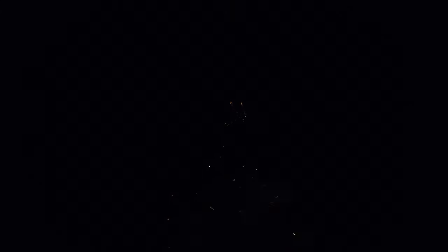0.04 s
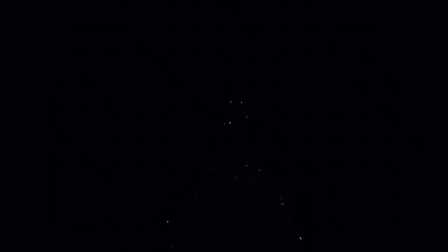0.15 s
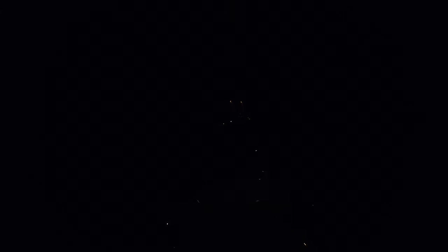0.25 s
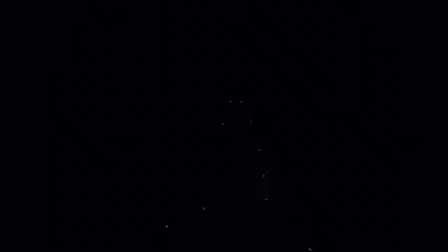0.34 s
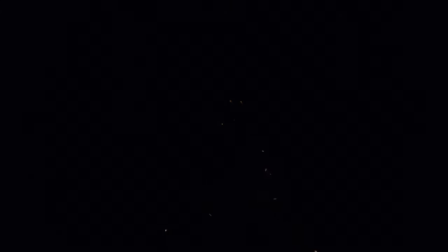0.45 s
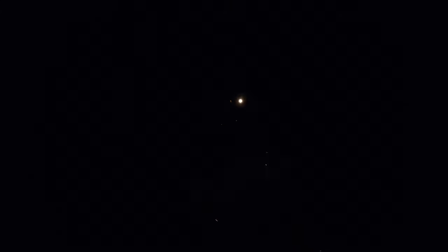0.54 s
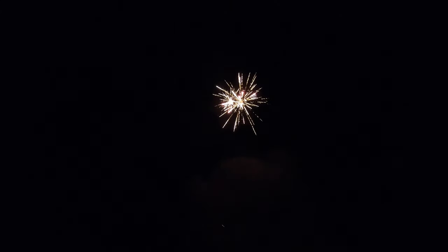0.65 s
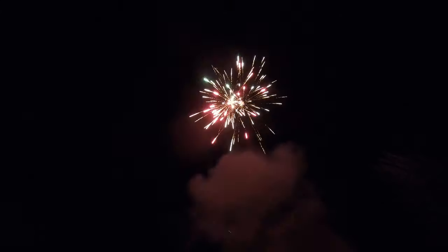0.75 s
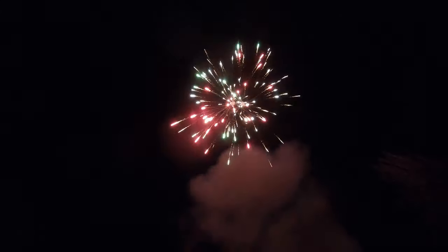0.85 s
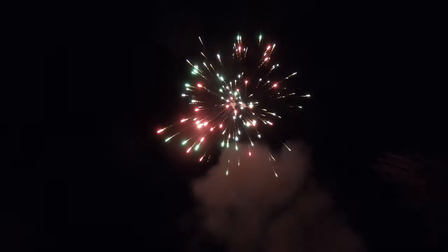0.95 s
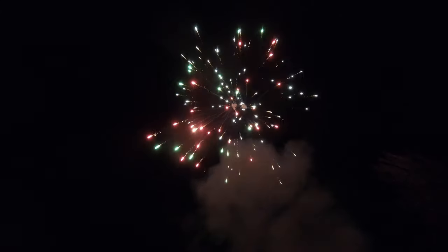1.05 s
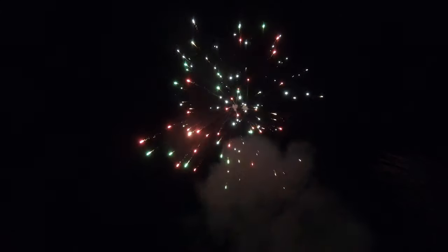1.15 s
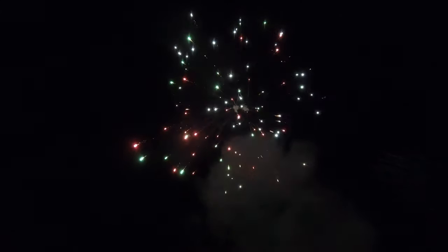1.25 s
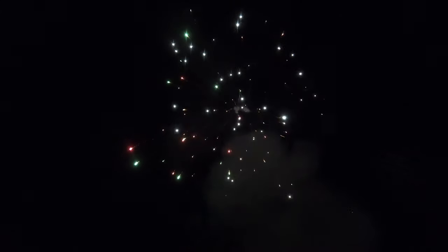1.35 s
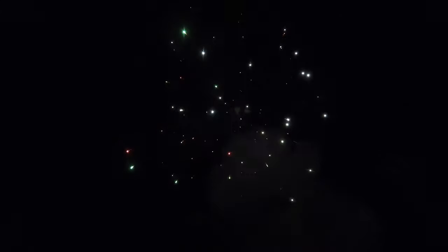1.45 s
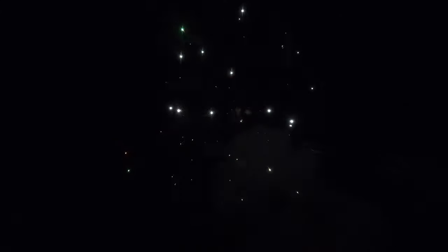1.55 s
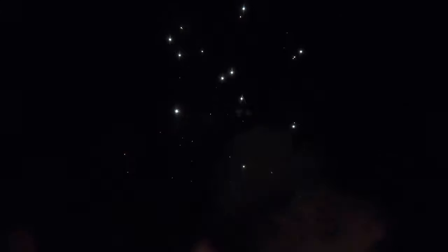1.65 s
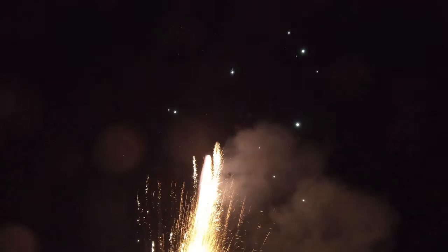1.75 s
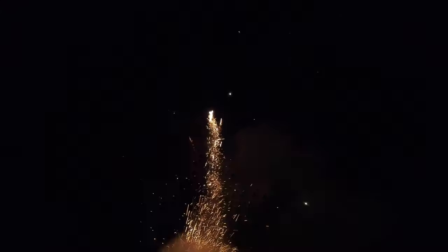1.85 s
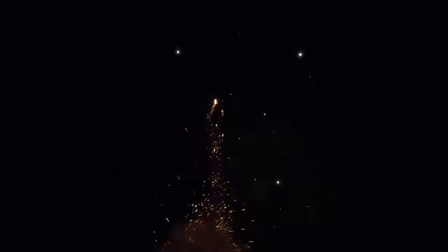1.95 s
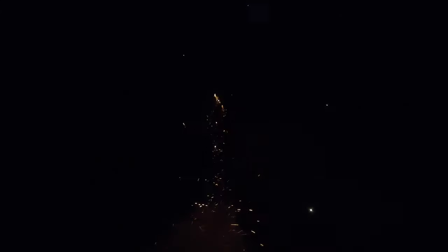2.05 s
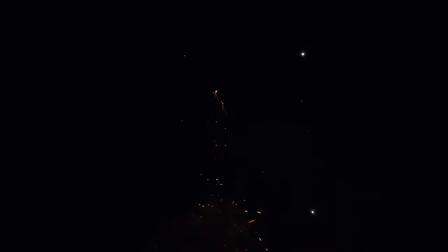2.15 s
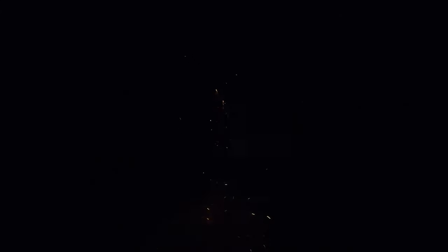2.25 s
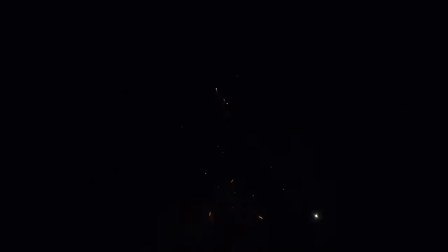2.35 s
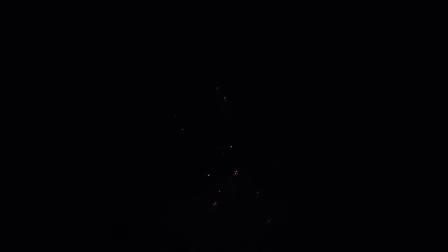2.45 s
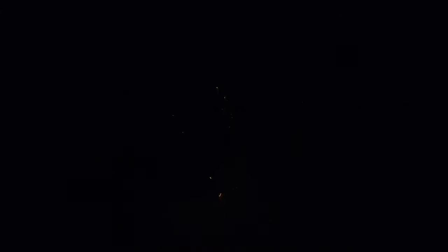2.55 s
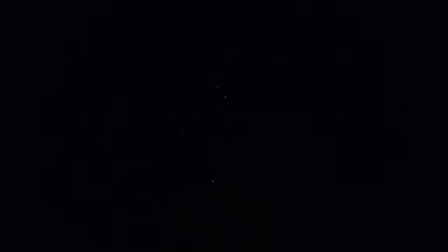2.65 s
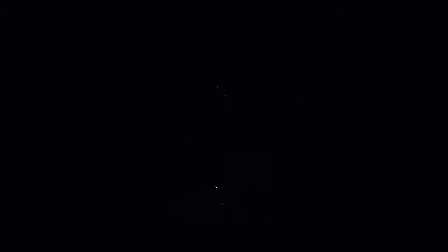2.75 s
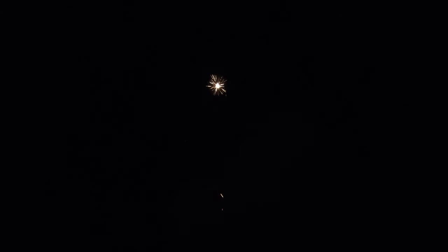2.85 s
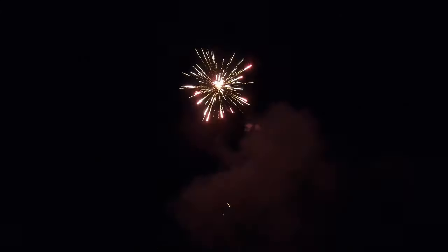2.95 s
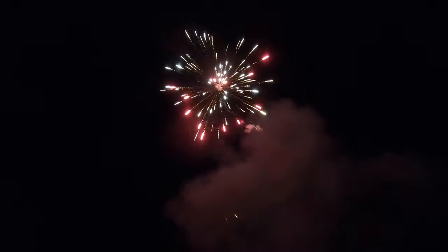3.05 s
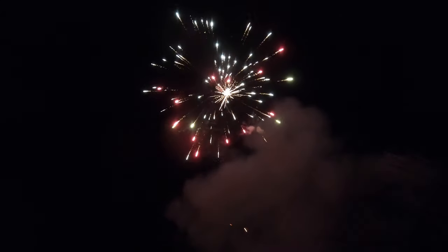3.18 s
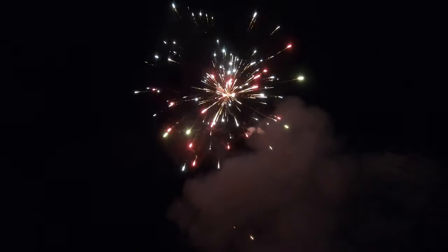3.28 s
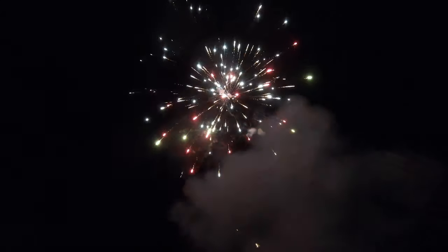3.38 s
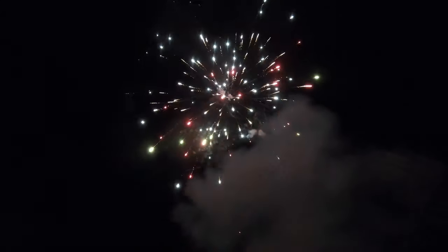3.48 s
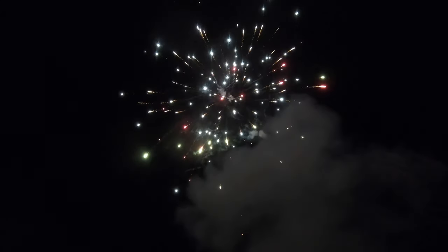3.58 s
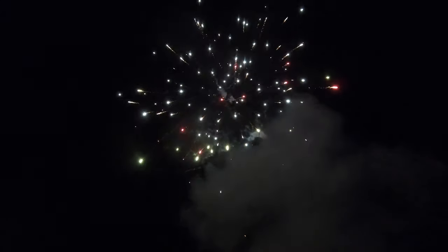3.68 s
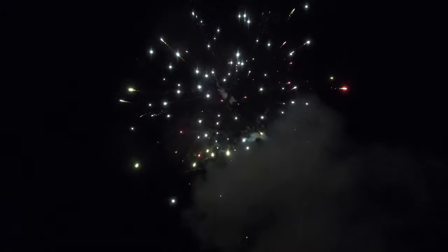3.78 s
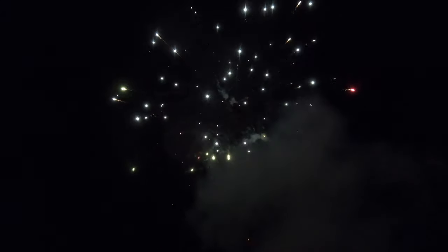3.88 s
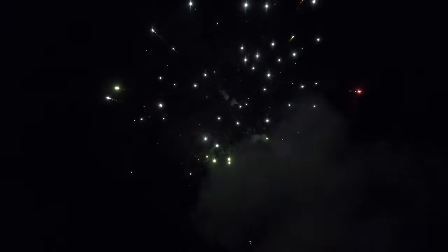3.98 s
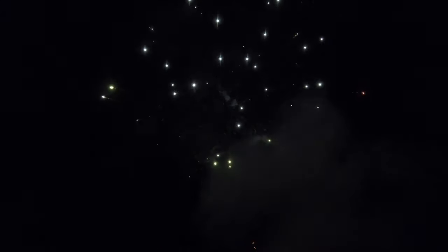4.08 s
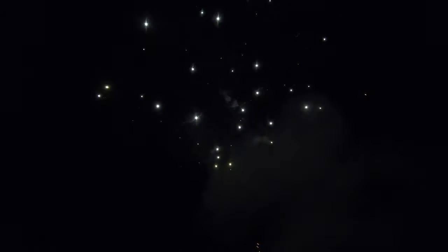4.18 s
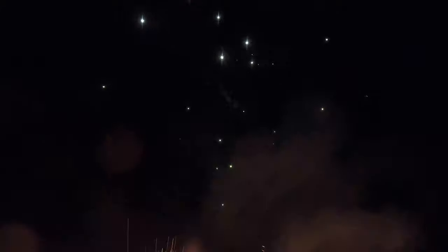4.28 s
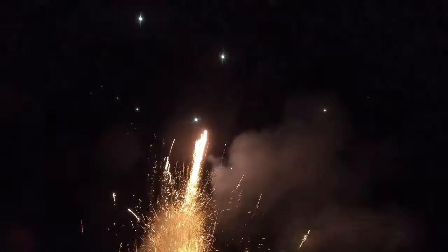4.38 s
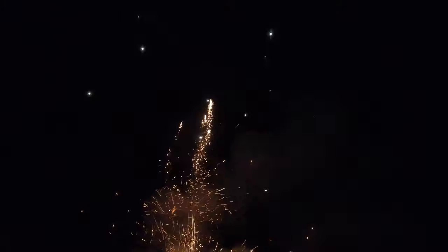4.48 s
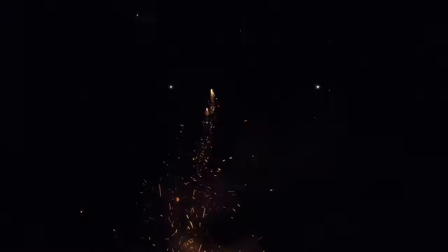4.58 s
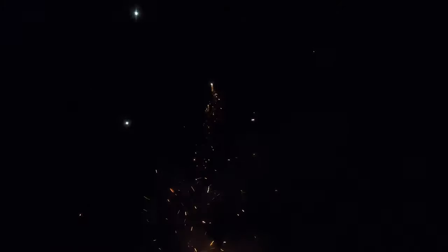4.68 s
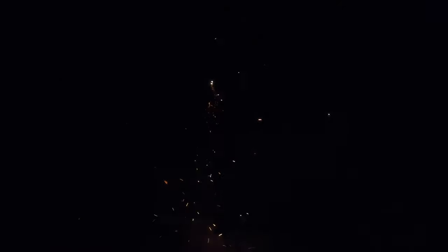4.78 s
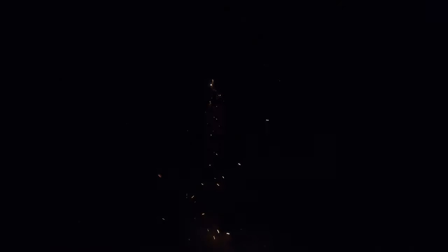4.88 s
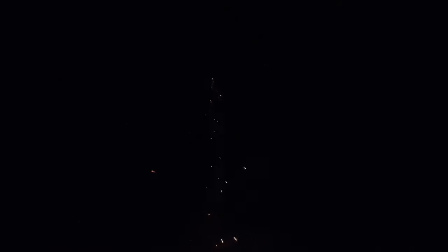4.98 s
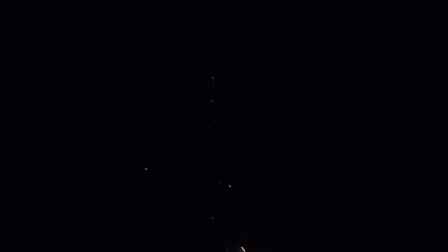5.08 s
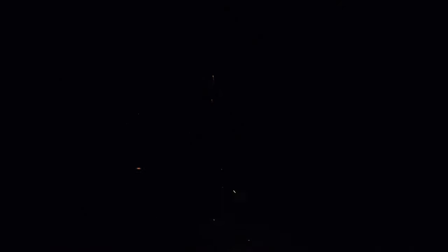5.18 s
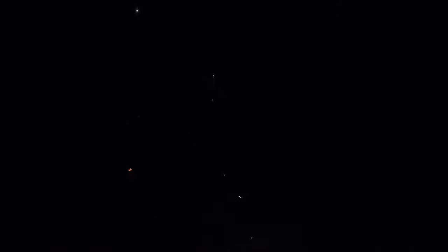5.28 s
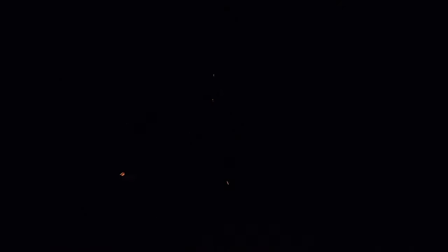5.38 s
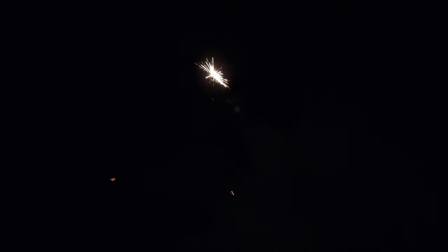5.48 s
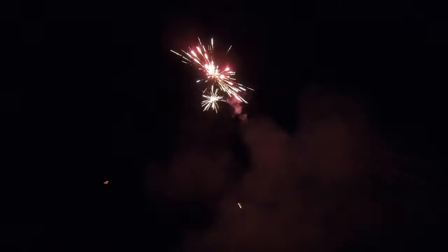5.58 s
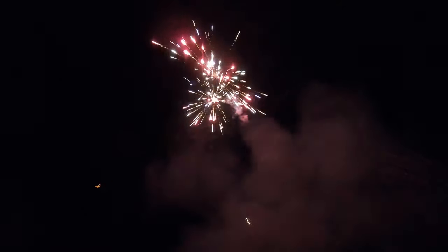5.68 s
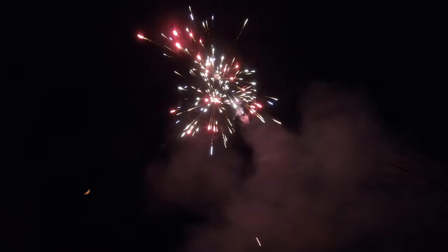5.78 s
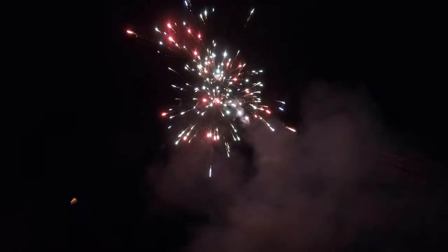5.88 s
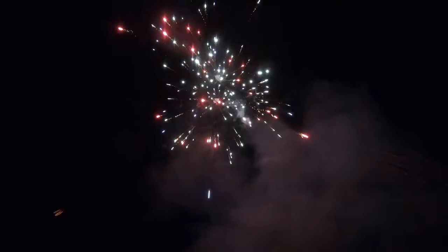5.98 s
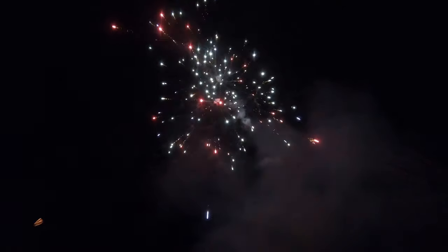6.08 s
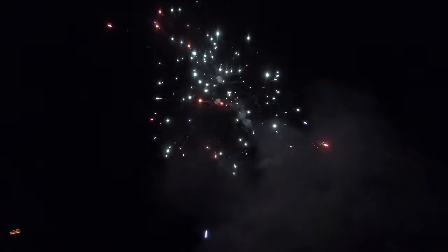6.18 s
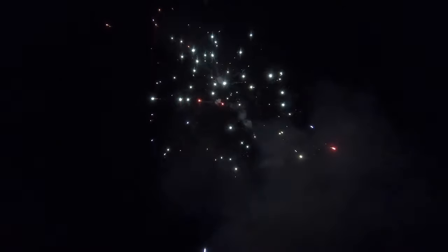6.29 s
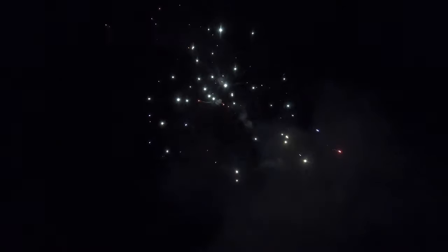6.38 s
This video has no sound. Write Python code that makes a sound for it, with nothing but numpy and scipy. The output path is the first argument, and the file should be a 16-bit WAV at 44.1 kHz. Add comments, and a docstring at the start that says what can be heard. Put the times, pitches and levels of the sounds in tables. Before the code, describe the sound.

A quiet, low night hum opens the scene outdoors. At about 0.7 seconds two shells burst overhead in rapid succession, each a hard crack with a deep thump, preceded by a tiny swelling flutter. Dull wall slaps follow and a broad, low rush of far echoes rolls on. Near 1.65 a nearly merged double launch thuds from the tubes, its brief rush dropping to a faint murmur. At 2.97 and 3.29 two more bursts bang, more clearly separated, with brighter cracks and a long rumbling tail. Small bright ticks of burnt scraps landing dot 3.6 to 4.1, on both sides. Another tight launch pair hits at 4.3, then murmur, with a very faint tick at 5.3. The last two bursts crack at 5.56 and 5.7, their echoes still rolling at the end, around 6.4. The stereo phone is close, and the background dips or shifts briefly at the reports.

```python
"""Outdoors at night, among walls and far slopes: a firework cake goes off near a stereo phone. Launch reports
come in pairs from the tubes, shell bursts in pairs overhead; each is a sharp pressure flip, a noisy crack and a
low thump, with low swells and short softer pulses just before it; a thin tone near 8 kHz also rises into each.
Walls return dull thumps, and far scenery a long rush of shaped noise whose bands rise and fade separately. A
few burnt scraps tick down as ringing, gritty clicks, over the night's hum, a steady coloured noise."""
import sys
import numpy as np
from scipy import signal
from scipy.fft import rfft, irfft
from scipy.io import wavfile
from scipy.ndimage import uniform_filter1d

SR = 44100
rng = np.random.default_rng(int(sys.argv[2]) if len(sys.argv) > 2 else 0)


def master(y):
    """Save y as 16-bit WAV."""
    cut = np.clip(np.atleast_2d(y).T, -1, 1)
    pcm = np.round(cut * 32767)  # scale
    wavfile.write(sys.argv[1], SR, pcm.astype(np.int16))


N = 283563


def undb(db):
    """Turn dB into an amplitude factor."""
    return 10 ** (np.asarray(db) / 20)


def along(table, hz):
    """Read a (f/Hz, value) table on a log-frequency axis."""
    f, v = np.transpose(table)
    return np.interp(np.log(np.maximum(hz, 1)), np.log(f), v)


def add(out, x, s, pan_db):
    """Mix a short sound in, its middle sample at s seconds; pan_db is left minus right."""
    i = int(s * SR) - x.shape[-1] // 2
    out[:, i:i + x.shape[-1]] += x * undb(np.array([[pan_db], [-pan_db]]) / 2)


def dull(x, hz):
    """Take off the treble above hz with a gentle low-pass."""
    return signal.sosfilt(signal.butter(2, min(hz, .45 * SR), fs=SR, output="sos"), x)


def flip(t, lead_s=.00040, back_s=.00046, soft_hz=4200.):
    """The shock front: a quick climb, a sudden drop through zero, a short low plateau."""
    climb = 1.15 * np.exp(np.minimum(t, 0) / lead_s)
    plateau = -np.exp(-(np.maximum(t, 0) / back_s) ** 3)
    return dull(np.where(t < 0, climb, plateau), soft_hz)


def thump(t, start_s=.0009, half_s=.0017, slowing=.7, fade_s=.0075):
    """The ground bounce and the air's rebound: three half swings, each longer than the last."""
    u = np.maximum(t - start_s, 0)
    turns = (u / half_s) ** slowing
    swing = np.sin(np.pi * np.minimum(turns, 3)) * np.exp(-u / fade_s)
    last_half = .8 * np.clip(4 - 4 * turns / 3, 0, 1) ** .3
    return swing * np.where(turns > 2, last_half, 1)


# Shell bursts overhead, then launches from the tubes. Columns of both: [t/s, flip level/dB, thump level/dB,
# thump stretch (factor), crack level/dB, lead-in level/dB, wall echo level/dB,
# brief change of the background level/dB, left minus right level/dB, rush level/dB]
BURSTS = [(0.7021, 1, -4, 0.89, -18.5, -22, -11.5, -9.5, -3.5, -3),
          (0.7585, -6.5, -4, 1.09, -26, -29.5, -17, -9, -2.5, -3),
          (2.965, 0, -4, 0.91, -19, -24.5, -28, -10.5, -4, -1.5),
          (3.2857, 1.5, -5, 1.02, -12.5, -18, -27, -13, -3, -2.5),
          (5.563, 0, -4, 1, -16, -25.5, -27, -7.5, -3, -1.5),
          (5.7044, -3.5, -4, 0.91, -12.5, -19, -18, -9, -4, -5)]
LAUNCHES = [(1.6544, -6, -6.5, 1.47, -13.5, -6, -15, -10, -1.5, -5),
            (1.6933, -13.5, -6.5, 1.22, -18, -36.5, -14.5, -5.5, -1.5, 0),
            (4.2833, -2, -1.5, 1.2, -8, -6, -15, 4.5, -2.5, -3),
            (4.3052, -13, -5.5, 1.13, -23.5, -27.5, -18, -9.5, -2, -2.5)]
# Noise colour of the crack: [f/Hz, relative level/dB per Hz]
CRACK_COLOUR = [(2940, -29.5), (5000, -10.5), (6450, 1.5), (7310, 6), (9340, -3), (11600, -26),
                (13900, -29), (16500, -35.5)]
CRACK_SIZE = 4.2  # root of the summed squares before its level, alike for every crack
# Softer pulses before a report, the nearest to it first: [level/dB relative to the row's lead-in level]
PULSE_DB = [0, -4, -18, -22]
PULSE_GAP_S = .01065
# Wall echoes: [delay t/s, level/dB relative to the row's wall echo level, top f/Hz]
WALLS = [(.121, -13, 900), (0.18, -5.5, 490), (.292, -17, 440)]


def reports(right_lag_s=.00009):
    """Every burst and launch: lead-in, shock front and its ground bounce, crack, thump, wall echoes."""
    out, t = np.zeros((2, N)), np.arange(-2048, 2048) / SR
    rows = BURSTS + LAUNCHES
    ports = t - np.array([[-right_lag_s], [right_lag_s]]) / 2  # the front reaches the left port first
    bounce, bounce_s = .22, .00095  # the front again, off the ground
    front = dull(flip(ports) + bounce * flip(ports - bounce_s), 7600.0)
    colour = undb(along(CRACK_COLOUR, np.fft.rfftfreq(len(t), 1 / SR)))
    hisses = irfft(rfft(rng.standard_normal((len(rows), 2, len(t)))) * colour)
    low_noises = dull(dull(rng.standard_normal((len(rows), len(t))), 1001.0), 2000.0)
    for row, hiss, low_noise in zip(rows, hisses, low_noises):
        s, flip_db, thump_db, stretch, crack_db, lead_db, wall_db, _, pan_db, _ = row
        hiss, low_noise = hiss / hiss.std(), low_noise / low_noise.std()
        low = dull(thump(t / stretch), 1600.0)
        crack_fade = np.exp(-np.abs(t) / .0004) + .15 * np.exp(-np.abs(t) / .002)
        crack = hiss * (t > -.0002) * crack_fade
        crack = CRACK_SIZE * crack / np.sqrt(np.mean(np.sum(crack ** 2, axis=1)))
        add(out, undb(flip_db) * front, s, -.5)
        add(out, undb(crack_db) * dull(crack, 12000.0), s, -6.0)
        add(out, undb(thump_db) * low, s, pan_db)
        # a rough low noise and a 48 Hz swing build up before the front
        swell = undb(-2.0) * low_noise * (t < 0) * np.exp(np.minimum(t, 0) / 0.0061)
        swing_shape = np.exp(-((t + .012) / .014) ** 2)
        swing = undb(lead_db - 3) * np.cos(2 * np.pi * 48 * (t + .002)) * swing_shape
        add(out, undb(lead_db) * (swell + swing), s, pan_db)
        # a thin steady tone near 8 kHz and a little hiss grow just before the front
        tone = np.sin(2 * np.pi * 7950 * t)
        high = (t < 0) * np.exp(np.minimum(t, 0) / 0.01) * (tone + 0.47 * hiss)
        add(out, undb(lead_db - 24.5) * high, s, -6.0)
        # short softer pulses come before the report, each upside down to the next
        pulse = .6 * flip(t, .002, .0008, 1300.) + .7 * low + undb(-23) * crack
        for k, db in enumerate(PULSE_DB, 1):
            add(out, (-1) ** k * undb(lead_db + db) * pulse, s - k * PULSE_GAP_S, pan_db)
        for lag, db, hz in WALLS:
            add(out, undb(wall_db + db) * dull(thump(t / 1.46), hz), s + lag - .004, -1.5)
    return out


# Single far faces that stand out of the rush: [t/s, peak level/dB before panning]
SLAPS = [(0.927, -31), (0.984, -29.5), (1.317, -35), (3.191, -26), (3.504, -26), (4.207, -37.5),
         (5.922, -31)]


def slaps():
    """Far faces return scattered, dull puffs of noise, each a few milliseconds long."""
    out, t = np.zeros((2, N)), np.arange(-1024, 1024) / SR
    for (s, db), noise in zip(SLAPS, rng.standard_normal((len(SLAPS), len(t)))):
        puff = dull(dull(noise * (t > 0) * np.exp(-np.abs(t) / 0.0057), 1400.), 5000.)
        add(out, undb(db) * puff / np.abs(puff).max(), s, -3.0)
    return out


# Bands of the rush: [low edge f/Hz, high edge f/Hz]
RUSH_BANDS = [(70, 220), (280, 750), (1100, 3000), (5000, 9000), (10500, 13000)]
# Noise colour of the rush before its bands are levelled: [f/Hz, relative level/dB per Hz]
RUSH_COLOUR = [(12, -56.5), (20, -40.5), (86, -2.5), (135, 1), (160, 0.5), (361, -3.5), (492, -7),
               (966, -20), (1180, -19), (1560, -22), (3230, -29.5), (4790, -40), (7510, -37.5),
               (13600, -65), (16500, -85)]
# Stereo likeness: [f/Hz, left-right likeness, held to 0-1 when played]
RUSH_ALIKE = [(60, 1), (130, 1), (290, 1), (640, 0.6), (1410, 0.6), (3100, 0.5), (6820, -0.12), (15000, 0)]
# Stereo balance: [f/Hz, left minus right level/dB]
RUSH_PAN = [(60, -3.5), (110, -1.5), (200, -1.5), (380, -4.5), (700, -6), (1290, -4.0), (2380, -4),
            (4400, -1.5), (8120, -1.5), (15000, -1)]
# Stereo phase of the shared part: [f/Hz, left lead/radians]
RUSH_PHASE = [(100, 0.49), (520, 0.37), (1290, 1), (4000, -1.0)]


def rush():
    """Countless far echoes merge into noise; its bands follow their levels and flicker a little."""
    hz = np.fft.rfftfreq(N + 1, 1 / SR)
    a, b = rfft(rng.standard_normal((2, N + 1))) * undb(along(RUSH_COLOUR, hz))
    alike, tilt = np.clip(along(RUSH_ALIKE, hz), 0, 1), undb(along(RUSH_PAN, hz) / 2)
    shared = alike * a * np.exp(-1j * along(RUSH_PHASE, hz))
    pair = np.array([a * tilt, (shared + np.sqrt(1 - alike ** 2) * b) / tilt])
    # each band's own level is taken off, so that the wanted level replaces it
    power = np.abs(pair.mean(axis=0)) ** 2 * 2 / (N + 1) ** 2
    own_db = [10 * np.log10(power[(hz > lo) & (hz < hi)].sum()) for lo, hi in RUSH_BANDS]
    f, frames, z = signal.stft(irfft(pair), SR, nperseg=512, noverlap=384)
    want_db = rush_db(frames) - np.array(own_db)[:, None]
    centres = np.sqrt(np.prod(RUSH_BANDS, axis=1))
    db = np.array([along(np.c_[centres, column], f) for column in want_db.T]).T
    # a small random flicker moves all bands together; neighbouring bins also flicker on their own
    together = uniform_filter1d(rng.standard_normal(len(frames)), size=5) * np.sqrt(5)
    alone = uniform_filter1d(rng.standard_normal(db.shape), size=9, axis=1)
    alone = uniform_filter1d(alone, size=9, axis=0) * 9
    z = z * undb(db + 0.69 * together + 0.21 * alone)
    return signal.istft(z, SR, nperseg=512, noverlap=384)[1][:, :N]


# Rush after one burst or one launch, before the report's own rush level; one row per band of RUSH_BANDS:
# [crest level/dB, crest t/s after the report, rise level/dB per s, fade level/dB per s]
BURST_RUSH = [(-36, 0.86, -1.5, -3.5), (-32.5, 0.52, 10.5, 0.5), (-44, 0.47, 5.5, 11.5),
              (-50, 0.22, -4, 34.5), (-71, 0.1, 7, 83)]
LAUNCH_RUSH = [(-42, 0.16, 48, 38), (-57, 0.13, 60, 25), (-58.5, 0.058, 120, 18), (-61.5, 0.11, 110, 35),
               (-81, 0.11, 60, 91)]
LAUNCH_RUSH_S, LAUNCH_END_DB_S = 0.38, 250  # the launch rush stops short: seconds, extra dB per s
# Broad far slopes swell the rush of a burst or a launch:
# [t/s after the report, length t/s, centre f/Hz, width/octaves, lift level/dB]
SWELLS = [(.075, .03, 354, 3.9, 9), (.222, 0.0059, 1510, 3.4, 2.5), (.4, 0.096, 474, 1.1, 6.5),
          (.68, .09, 130, .9, 5)]
LAUNCH_SWELLS = [(.125, 0.023, 2000, 2.1, 9)]
# Faint lingering murmur, one row per band: [level/dB, fade level/dB per s, negative where it grows]
MURMUR = [(-56, -1), (-59.5, -5), (-63.5, 7), (-80, 12.5), (-120, -0.8)]
# Stretches of murmur, each lasting until the next: [start t/s, level/dB, lift level/dB around MURMUR_HZ]
MURMURS = [(-.4, -.5, -8.5), (1.6548, 1.5, -2), (4.2827, 0, -4.5)]
MURMUR_HZ = 450


def rush_db(t):
    """Level of each band at times t: the rushes of all reports and the murmur add up in power."""
    centre = np.log2(np.sqrt(np.prod(RUSH_BANDS, axis=1)))[:, None]
    starts = np.append(np.transpose(MURMURS)[0], np.inf)
    power = 0
    for row in BURSTS:
        u = t - row[0]
        end = starts[starts > row[0]][0]  # a burst's rush ends where the next murmur starts
        db = row[-1] + crest(u, BURST_RUSH) + swell_db(u, centre, SWELLS)
        power = power + undb(db) ** 2 * (u > 0) * (t < end)
    for row in LAUNCHES:
        u = t - row[0]
        db = row[-1] + crest(u, LAUNCH_RUSH) + swell_db(u, centre, LAUNCH_SWELLS)
        db = db - LAUNCH_END_DB_S * np.maximum(u - LAUNCH_RUSH_S, 0)
        power = power + undb(db) ** 2 * (u > 0)
    top_db, fade = np.transpose(MURMUR)[:, :, None]
    for (s, db, lift_db), end in zip(MURMURS, starts[1:]):
        lift = lift_db * np.exp(-(centre - np.log2(MURMUR_HZ)) ** 2)
        murmur_db = top_db + db + lift - fade * (t - s)
        power = power + undb(murmur_db) ** 2 * (t >= s) * (t < end)
    return 10 * np.log10(power)


def crest(u, shape):
    """Band levels in dB, u seconds after a report: a straight line to the crest, then another away."""
    top_db, s, rise, fade = np.transpose(shape)[:, :, None]
    return top_db - np.where(u < s, rise * (s - u), fade * (u - s))


def swell_db(u, centre, slopes):
    """Far slopes lift the rush in dB: bell-shaped in time and in octaves."""
    lift = 0
    for s, length, hz, wide, db in slopes:
        lift = lift + db * np.exp(-((u - s) / length) ** 2 - ((centre - np.log2(hz)) / wide) ** 2)
    return lift


def dips(fall_s=0.0029, hold_s=0.019, back_s=0.034):
    """The background level changes briefly at each report, mostly a dip, and glides back, in dB."""
    t, db = np.arange(N) / SR, 0
    for row in BURSTS + LAUNCHES:
        u, dip_db = t - row[0], row[7]
        recovery = np.exp(-(np.maximum(u - hold_s, 0) / back_s) ** 2)
        db = db + dip_db * np.clip(u / fall_s, 0, 1) * recovery
    return db


# Scraps landing: [t/s, level/dB before softening, ring f/Hz, left minus right level/dB]
SCRAPS = [(3.62, -31.5, 8190, 8), (3.6413, -19, 7730, -8), (3.7778, -30.5, 7900, 9),
          (3.8716, -36, 9200, -13), (3.9512, -40, 8900, -11), (4.106, -48, 6100, -2),
          (5.309, -55.5, 6160, 2.5)]


def scraps():
    """Tiny hard bits strike the ground: a bright, gritty tick with a millisecond of ring."""
    out, t = np.zeros((2, N)), np.arange(-256, 256) / SR
    grit_band = signal.butter(2, [4500, 15500], "band", fs=SR, output="sos")
    for (s, db, hz, pan_db), noise in zip(SCRAPS, rng.standard_normal((len(SCRAPS), len(t)))):
        grit = signal.sosfilt(grit_band, noise)
        ring = np.sin(2 * np.pi * hz * t)
        tick = (t > 0) * np.exp(-np.abs(t) / 0.00068) * (ring + 0.46 * grit)
        add(out, undb(db) * dull(tick, 10800.0), s + 0.00035, pan_db)
    return out


# Noise colour of the night air: [f/Hz, relative level/dB per Hz]
NIGHT_COLOUR = [(40, -20), (80, -7.5), (190, -1), (440, -14), (780, -28.5), (1100, -18.5), (1600, -24),
                (5000, -61.5), (7000, -92)]
NIGHT_DB = -56.5  # level of the middle signal before the left-right balance


def night():
    """The steady hum of the night air: coloured noise, nearly the same left and right."""
    colour = undb(along(NIGHT_COLOUR, np.fft.rfftfreq(N + 1, 1 / SR)))
    mid, side = irfft(rfft(rng.standard_normal((2, N + 1))) * colour)[:, :N]
    side = side - dull(side, 500.)  # less width in the bass
    balance_db = np.array([[-1.3], [1.3]])
    stereo = mid + 0.41 * side * np.array([[1], [-1]])
    return undb(NIGHT_DB + balance_db) * stereo / mid.std()


def scene():
    """Reports, slaps and scraps over a background of rush and night that shifts at each report."""
    return reports() + (rush() + night()) * undb(dips()) + slaps() + scraps()


TOP_HZ = 16600


def record(dry):
    """The phone hisses faintly, drops the lowest bass, clips at full scale and cuts the top."""
    hissy = dry + undb(-94.0) * rng.standard_normal(dry.shape)
    x = signal.sosfilt(signal.butter(1, 18, "high", fs=SR, output="sos"), hissy)
    soft = dull(np.clip(x, -1, 1), 13000.0)
    top_cut = signal.ellip(8, .2, 70, TOP_HZ, fs=SR, output="sos")
    return np.clip(signal.sosfilt(top_cut, soft), -1, 1)


dry = scene()
out = record(dry)
master(out)
```